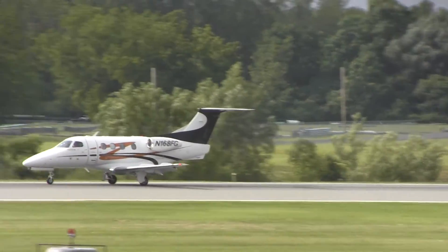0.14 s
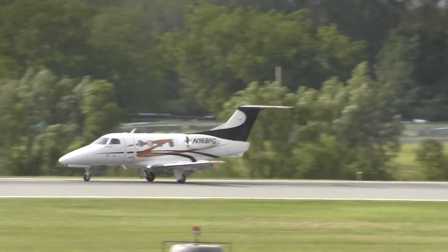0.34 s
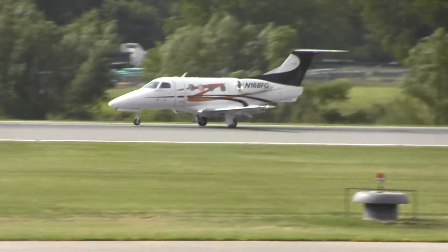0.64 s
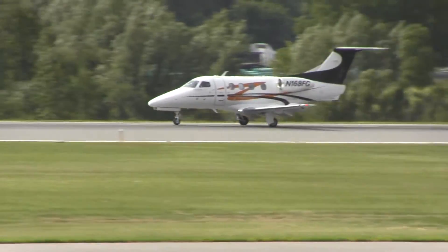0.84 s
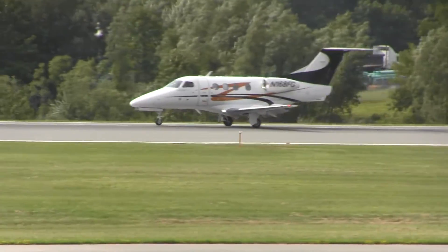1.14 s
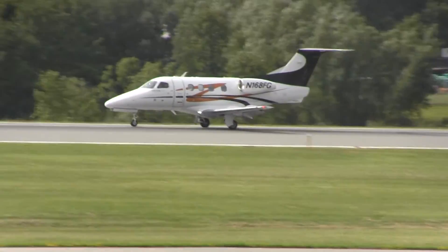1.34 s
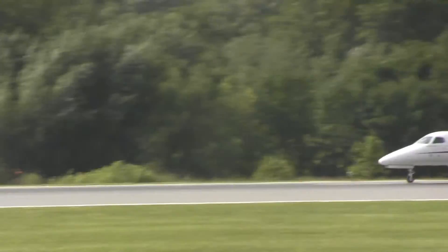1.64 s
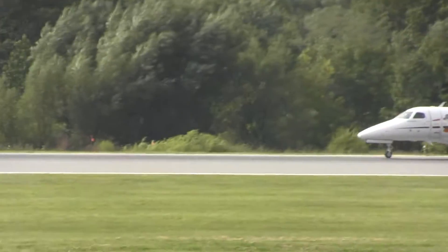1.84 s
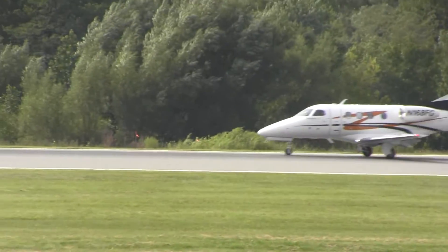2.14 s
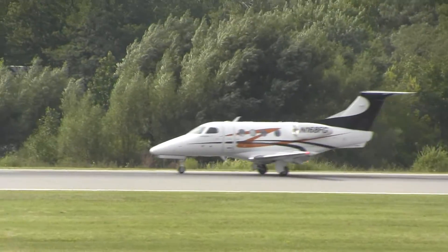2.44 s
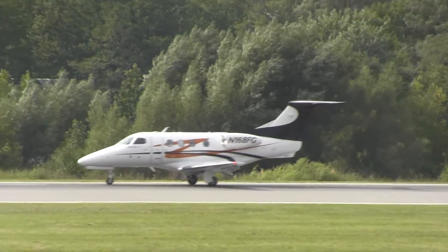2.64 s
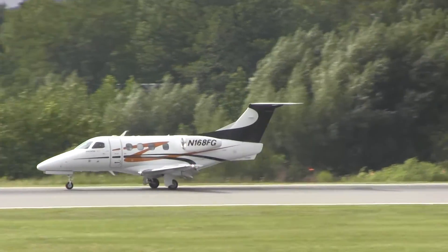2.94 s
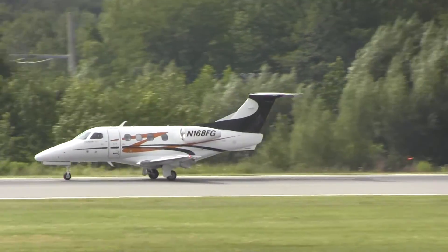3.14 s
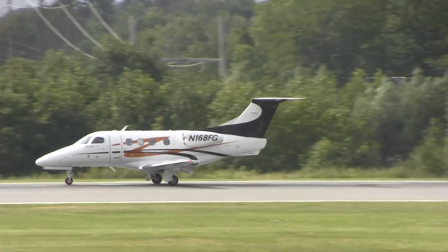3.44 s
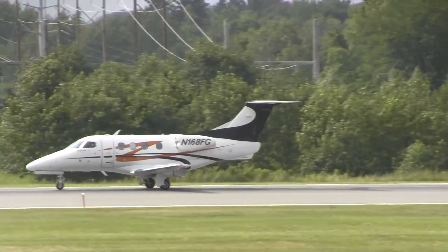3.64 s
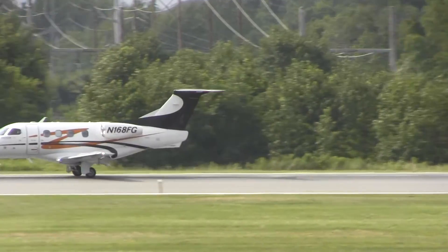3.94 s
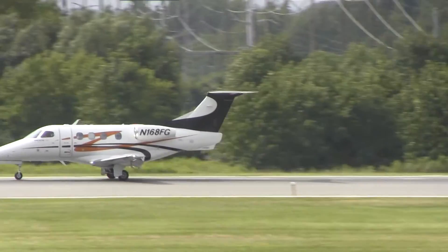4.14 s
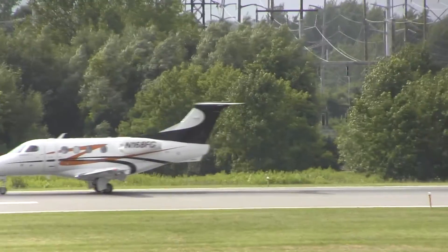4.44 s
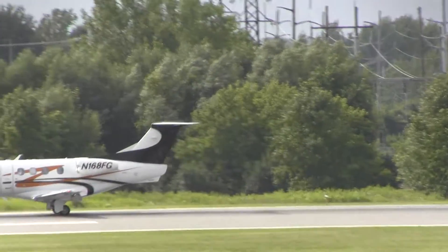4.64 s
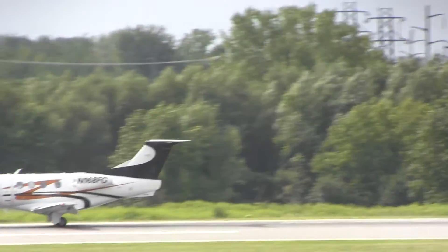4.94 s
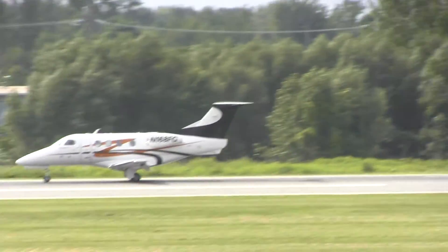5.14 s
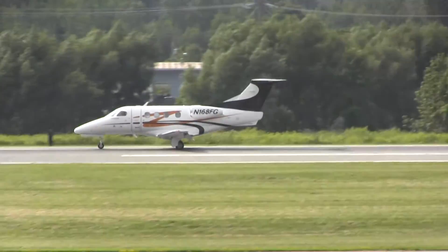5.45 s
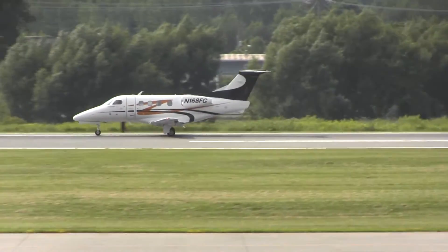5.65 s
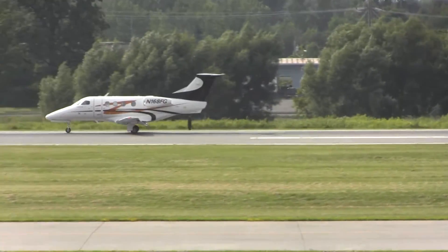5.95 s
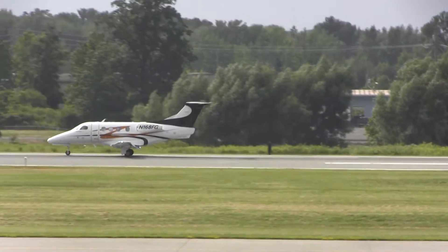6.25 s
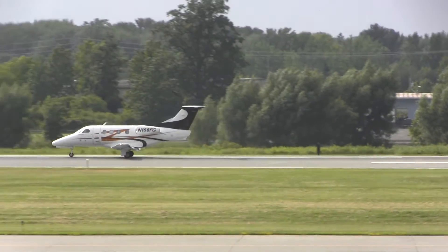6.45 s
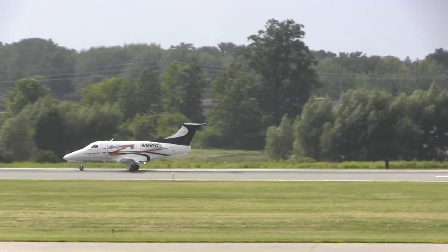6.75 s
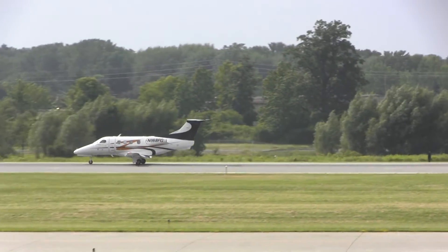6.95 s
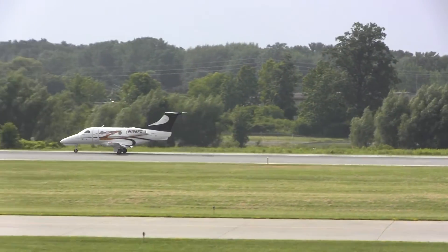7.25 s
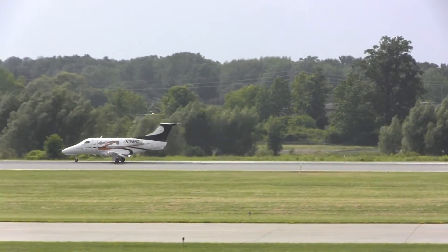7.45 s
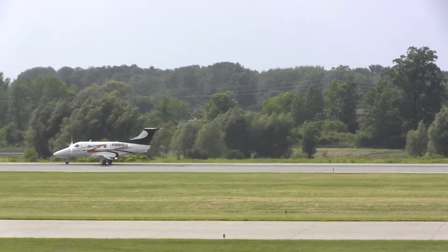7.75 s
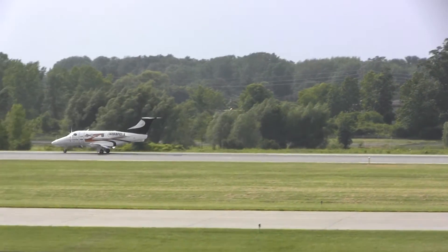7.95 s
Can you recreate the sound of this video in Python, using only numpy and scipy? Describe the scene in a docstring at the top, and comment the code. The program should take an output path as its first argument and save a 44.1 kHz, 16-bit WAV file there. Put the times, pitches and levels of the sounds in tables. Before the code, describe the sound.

A small twin-engined jet rolls along a runway, heard from across an open field. Its broad hiss starts faint over a far low roar, then surges, joined by a thin high whine that drifts slightly down in pitch. The engine sound dips and swells again in the moving air. Gusts buffet the microphone with low rumbles and thumps, once hard near the middle and hardest later on.

```python
"""Jet across a windy field

A small twin-engined jet rolls along a runway: broad hiss, a far low roar, and fan whine that drifts
down in pitch as it draws level. Moving air bends the sound along the ground, so it swells and fades.
Gusts buffet the two ports of a microphone; halfway the bass turns thinner and nearly mono."""
import sys
import numpy as np
from scipy import signal
from scipy.fft import rfft, irfft, next_fast_len
from scipy.io import wavfile
from scipy.ndimage import uniform_filter1d, map_coordinates

SR = 44100
rng = np.random.default_rng(int(sys.argv[2]) if len(sys.argv) > 2 else 0)


def master_out(mix):
    """Clip the mix to full scale and print it as 16-bit PCM to the path in sys.argv[1]."""
    frames = np.transpose(np.atleast_2d(mix))
    ceiling = np.clip(frames, -1, 1)
    pcm = np.round(ceiling * 32767).astype(np.int16)
    wavfile.write(sys.argv[1], SR, pcm)


N = 356769


def amp(db):
    """dB to gain."""
    return 10 ** (np.asarray(db) / 20)


def unit(x):
    """Scale to rms 1."""
    return x / np.sqrt(np.mean(x ** 2) + 1e-20)


def along(points, hz):
    """Interpolate (freq_hz, value) points on a log axis."""
    freqs, values = np.transpose(points)
    return np.interp(np.log(hz + 1), np.log(freqs + 1), values)


def curve(points, t=None):
    """Interpolate (time_s, value) points at t, or at every sample."""
    times, values = np.transpose(points)
    return np.interp(np.arange(N) / SR if t is None else t, times, values)


def wobble(rate_hz):
    """Smooth random curve, rate_hz knots a second."""
    knots = rng.standard_normal(int(N * rate_hz / SR) + 4)
    return map_coordinates(knots, [np.arange(N) * rate_hz / SR])


def filtered(x, response):
    """Apply a gain given as a function of Hz."""
    size = next_fast_len(N + 8192)
    return irfft(rfft(x, size) * response(np.fft.rfftfreq(size, 1 / SR)), size)[..., :N]


def coloured(x, spectrum):
    """Apply a (freq_hz, gain_db) spectrum; white noise keeps its rms."""
    norm = np.sqrt(np.mean(amp(along(spectrum, np.arange(SR // 2))) ** 2))
    return filtered(x, lambda f: amp(along(spectrum, f)) / norm)


def step(hz, corner_hz, octaves):
    """Smooth rise from 0 below the corner to 1 above."""
    return .5 + .5 * np.tanh(np.log2((hz + 1) / corner_hz) / octaves)


def stereo(mid, side):
    """Mid and side to left and right."""
    return np.array([mid + side, mid - side])


def turbulence(shape, bins, frames):
    """Random field of rms 1, smoothed over frequency and time."""
    field = uniform_filter1d(rng.standard_normal(shape), size=bins, axis=0)
    return unit(uniform_filter1d(field, size=frames, axis=1))


# Swell of the arriving hiss: time_s, level_db
HISS_SWELL = [(0, -41), (.3, -43), (.55, -36), (.7, -42.5), (1.71, -38), (1.94, -23.5), (2.12, -30),
              (2.2, -25), (2.3, -27), (2.43, -27), (2.68, -32), (3.02, -30), (3.13, -34), (3.18, -40),
              (3.6, -41), (3.66, -48), (3.76, -41), (3.92, -35.5), (4.1, -41), (4.28, -37.5), (4.38, -40.5),
              (4.5, -36), (4.57, -39), (4.64, -33), (4.84, -33), (4.95, -39.5), (5.6, -34.5), (5.8, -28.5),
              (6.12, -30), (6.24, -27), (6.5, -34), (6.58, -31), (6.87, -41.5), (7.42, -37), (7.66, -28.5),
              (7.82, -31.5), (7.98, -27), (8.09, -28.5)]
# Swell of its low band: time_s, level_db
BODY_SWELL = [(0.0, -46), (0.02, -44), (1.78, -44.5), (1.94, -38), (2.41, -31), (3.45, -42.5), (3.65, -43),
              (3.67, -50.5), (3.99, -43), (4.6, -48.5), (4.71, -40.5), (5.04, -45.5), (5.41, -37),
              (5.57, -41), (5.77, -26), (6.33, -36.5), (6.69, -36.5), (7.1, -44.5), (8.09, -36)]
# Hiss spectrum: freq_hz, gain_db
HISS_SPECTRUM = [(290, -54), (500, -20), (1000, -5.5), (1700, -5.5), (3400, -2), (5540, -1.5),
                 (7300, -13.5), (8550, -15), (11600, -34), (13000, -55), (16000, -70)]
# Steady peaks and a dip in it: centre_hz, width_hz, gain_db
HISS_HUMPS = [(1282, 124, 4.5), (2240, 206, -5), (2493, 197, 5), (3780, 120, 3), (4290, 120, 2.5)]
# Side of the hiss against its mid, at the start: freq_hz, gain_db
HISS_SPREAD = [(500, -20), (1500, -58), (2250, -15.5), (3200, -38.5), (6000, -23.5), (8500, -10.5),
               (15000, -26)]


def jet_hiss(treble_lead_s=0.048, treble_swing=0.99, treble_memory_s=0.3, treble_sag=0.14):
    """Inlet and exhaust noise; turbulence on the path adds patches and short flickers."""
    hz, t, spectra = signal.stft(rng.standard_normal((2, N)), SR, nperseg=512)
    hz = hz[:, None]
    level_db = curve(HISS_SWELL, t)
    body_db = curve(BODY_SWELL, t) + 7 - level_db
    # The treble swells early and sinks after a surge.
    early_db = treble_swing * (curve(HISS_SWELL, t + treble_lead_s) + 34)
    sag_db = treble_sag * (curve(HISS_SWELL, t - treble_memory_s) + 34)
    treble_db = early_db - sag_db - 36.8 - level_db
    lift_db = body_db * (1 - step(hz, 1850, 0.25)) + treble_db * step(hz, 6200, 0.3)
    patches_db = 2.03 * turbulence(spectra.shape[1:], bins=12, frames=8)
    flicker = turbulence(spectra.shape[1:], bins=45, frames=5)
    surge = np.clip((level_db + 52) / 20, 0, 2)
    flicker_db = 1.45 * flicker * surge * step(hz, 3200, 0.32)  # short waves scatter most
    spectra *= amp(level_db + lift_db + patches_db + flicker_db)
    spectra[1] *= amp(-.4 * t)  # the image narrows as the jet comes square to the ports
    mid_side = signal.istft(spectra, SR, nperseg=512)[1][:, :N]

    def response(f):
        humps_db = sum(db * np.exp(-((f - centre) / width) ** 2) for centre, width, db in HISS_HUMPS)
        mid_db = along(HISS_SPECTRUM, f) + humps_db
        return amp([mid_db, mid_db + along(HISS_SPREAD, f)])

    return amp(9.5) * stereo(*filtered(mid_side, response))


# Whine gain on top of the hiss swell: time_s, gain_db
WHINE_GAIN = [(0, -29), (1.8, -11.5), (2.4, -14.5), (5.52, -14), (5.64, -6.5), (6.1, -7.5), (6.4, -8.5),
              (6.9, -4.5), (7.7, -4.5), (8.09, -1)]
# Tones on the same shaft, against the blade tone: pitch_ratio, level_db, slope_db_per_s
SHAFT_TONES = [(.956, -3, -2), (1.236, -15, -.6), (1.468, -19, -1), (1.493, -14, -3)]


def fan_whine(start_hz=5655, fall_hz_per_s=37.6):
    """Blade tones fall as the jet draws level; each twinkles on its way through moving air."""
    t = np.arange(N) / SR
    cycles = np.cumsum(start_hz - fall_hz_per_s * t) / SR

    def tone(ratio, blur):
        scatter = 1 + blur * (wobble(55) + 1j * wobble(55))
        return unit(np.real(np.exp(2j * np.pi * ratio * cycles) * scatter))

    blade = tone(1, blur=.7)
    shaft = sum(amp(db + slope * t) * tone(ratio, blur=1) for ratio, db, slope in SHAFT_TONES)
    return amp(curve(HISS_SWELL) + curve(WHINE_GAIN) + 2) * (blade + shaft)


# Single hard eddies: centre_s, level_db, pitch_hz, snap_db
HARD_EDDIES = [(1.474, -28.5, 143, -18), (2.28, -19, 187, -11), (2.551, -23, 158, -27),
               (2.645, -22.5, 176, -24), (3.071, -23.5, 260, -2), (3.572, -24, 150, -9),
               (3.598, -11.5, 270, -13), (3.621, -9, 212, -9), (3.644, -13.5, 207, -6.5),
               (3.692, -22, 160, -28), (3.784, -23.5, 141, -14), (4.322, -28.5, 250, 4),
               (4.345, -22, 330, 1.5), (6.301, -26, 220, 0), (6.351, -19, 250, -13), (6.377, -8, 220, -13),
               (6.398, -19.5, 240, 1), (6.415, -13.5, 275, -10), (6.441, -18, 254, -4),
               (6.486, -13.5, 250, -8), (6.514, -18.5, 273, 3), (6.567, -12.5, 210, -16),
               (6.579, -7.5, 302, -13), (6.594, -6, 220, -19), (6.625, -23, 292, 1),
               (6.828, -20, 338, -8.5), (7.298, -23.5, 260, -6)]


def eddy_thumps(swing_cycles=0.78, snap_s=0.0047):
    """A hard eddy is a short pressure swing with a rough snap; it meets the ports out of step."""
    half = SR // 40
    t = np.arange(-half, half) / SR
    swings, snaps = np.zeros((2, 2, N + SR))
    split = np.array([[.5], [-.5]])  # left, right
    draws = rng.uniform(-1.48, 1, size=(len(HARD_EDDIES), 2))
    _, _, side_db, lean_db = stereo_image()
    for (centre_s, db, hz, snap_db), (offset, slip) in zip(HARD_EDDIES, draws):
        centre = round(centre_s * SR)
        span = slice(centre - half, centre + half)
        width = min(2 * amp(side_db[centre]), 1)
        gain = amp(db + width * lean_db[centre] * split)
        phase = np.pi * offset + np.sign(slip) * np.pi / 2 * width * split
        envelope = np.exp(-(t * hz / swing_cycles) ** 2)
        swings[:, span] += gain * envelope * np.cos(2 * np.pi * hz * t + phase)
        snaps[:, span] += gain * amp(snap_db) * np.exp(-(t / snap_s) ** 2)
    mid, side = rng.standard_normal((2, N))
    rough = stereo(mid, amp(np.minimum(side_db + 8, 0)) * side)
    snap_spectrum = [(250, -5), (500, 1), (1100, -6), (2000, -25.5), (6000, -120)]
    return amp(-1) * swings[:, :N] + amp(-6.5) * coloured(snaps[:, :N] * rough, snap_spectrum)


# Soft eddy spectrum: freq_hz, gain_db
EDDY_SPECTRUM = [(20, -34), (60, -4.5), (120, -1), (220, -6.5), (350, -11.5), (600, -23.5), (2000, -120)]
# Sharp edge of hard eddies: freq_hz, gain_db
EDGE_SPECTRUM = [(100, -40), (250, 6.5), (450, 1), (900, -8), (1600, -42), (5000, -120)]


def wind_buffeting():
    """Eddies burst on the ports a few cycles at a time; the harder they come, the sharper their edge."""
    wind_db = wind_strength()
    bass_db, low_side_db, high_side_db, _ = stereo_image()
    shared_lumps = wobble(50)
    lumps_db = 3.8 * shared_lumps + 2.1 * np.array([wobble(40), wobble(60)])
    soft_gain = amp(wind_db - 1.5) * unit(amp(lumps_db))
    edge_db = wind_db - 14 + 0.24 * (wind_db + 21.5) - 0.43 * bass_db
    edge_gain = amp(edge_db) * unit(amp(1.7 * lumps_db))
    soft = coloured(soft_gain * rng.standard_normal((2, N)), EDDY_SPECTRUM)
    edge = coloured(edge_gain * rng.standard_normal((2, N)), EDGE_SPECTRUM)
    mid, side = soft + edge
    bass = filtered(mid, lambda f: 1 - step(f, 137.4, 0.47))
    low_side = filtered(side, lambda f: 1 - step(f, 270, 0.23))
    mid = mid - bass + amp(bass_db) * bass
    side = amp(low_side_db) * low_side + amp(high_side_db) * (side - low_side)
    return stereo(mid, side)


# Breeze on the ports: time_s, level_db
BREEZE = [(0, -51.5), (1.4, -55), (2.1, -41), (3.1, -43), (3.5, -47.5), (3.8, -37.5), (4.15, -42.5),
          (4.5, -42), (5.0, -44), (5.5, -53.5), (6.2, -45), (6.7, -29), (7.0, -42), (8.09, -41)]
# Gusts at full strength: start_s, hold_s, level_db
GUST_PEAKS = [(3.59, 0.039, -27), (4.23, .12, -32.5), (5.72, .2, -40.5), (6.25, .29, -26), (6.54, 0.1, -19),
              (7.02, 0.092, -34), (7.2, 0.28, -33), (7.84, .3, -32.5)]


def wind_strength(rise_db_per_s=400, fall_db_per_s=303, wander_db=3):
    """Level in dB of the unsteady breeze, or of a gust where that is stronger."""
    t = np.arange(N) / SR
    wind_db = curve(BREEZE) + wander_db * wobble(7)
    for start_s, hold_s, db in GUST_PEAKS:
        before_s = np.maximum(start_s - t, 0)
        after_s = np.maximum(t - start_s - hold_s, 0)
        wind_db = np.maximum(wind_db, db - rise_db_per_s * before_s - fall_db_per_s * after_s)
    return wind_db


# Stereo image of the wind: start_s, mid_bass_db, low_side_db, high_side_db, left_lean_db
IMAGE_STAGES = [(0, 2, 6, -2, 7), (4.18, -11.5, -50, -21, -4), (6.2, -13, -37, -3, -0.5),
                (6.72, -27, -62, -62, -10.5)]


def stereo_image(fade_s=0.1):
    """Bass, width and lean hold through each stage, then fade into the next."""
    starts_s, *columns = np.transpose(IMAGE_STAGES)
    stage = np.searchsorted(starts_s, np.arange(N) / SR, "right") - 1
    held = np.array(columns)[:, np.maximum(stage, 0)]
    return uniform_filter1d(held, size=int(fade_s * SR) + 1, axis=1, mode="nearest")


# Far exhaust spectrum: freq_hz, gain_db
ROAR_SPECTRUM = [(40, -28), (100, 0), (250, -2.5), (500, -3), (900, -1.5), (1500, -44)]
# Far exhaust swell: time_s, level_db
ROAR_SWELL = [(0, -46), (3.1, -44), (3.4, -52), (5.6, -53.5), (8.09, -52)]


def exhaust_roar():
    """Low exhaust noise from across the field; its width follows the wind's image."""
    mid, side = rng.standard_normal((2, N))
    _, _, side_db, _ = stereo_image()
    mid = coloured(mid, ROAR_SPECTRUM)
    side = amp(np.minimum(side_db, 0) - 14) * coloured(side, [(100, -32), (600, -1), (2500, -26.5)])
    return amp(curve(ROAR_SWELL) + 0.92 * wobble(3.18)) * stereo(mid, side)


def scene():
    """Jet and wind at the two ports."""
    return jet_hiss() + fan_whine() + exhaust_roar() + wind_buffeting() + eddy_thumps()


def record(dry, ceiling=.7, low_cut_hz=31, top_hz=15720):
    """The input stage adds faint hiss, rounds off the hardest gusts, cuts deep bass and high treble."""
    noisy = dry + amp(-84) * rng.standard_normal(dry.shape)
    rounded = noisy / (1 + np.abs(noisy / ceiling) ** 4) ** (1 / 4)
    return filtered(rounded, lambda hz: (hz < top_hz) * step(hz, low_cut_hz, 0.68))


dry = scene()
out = record(dry)
master_out(out)
```